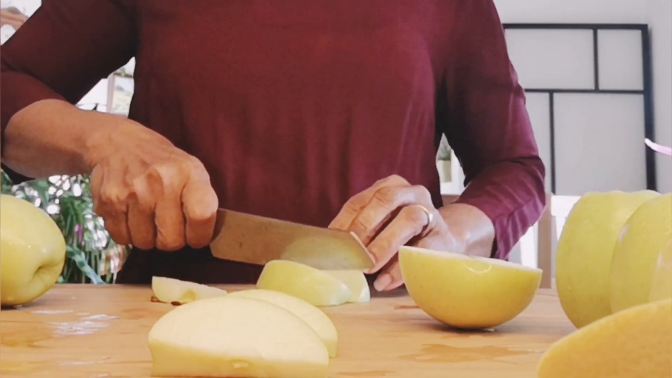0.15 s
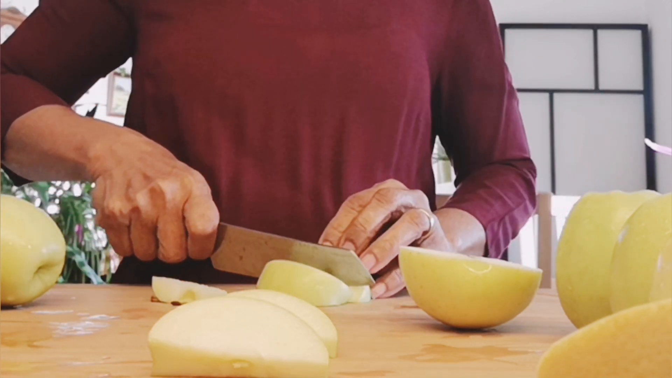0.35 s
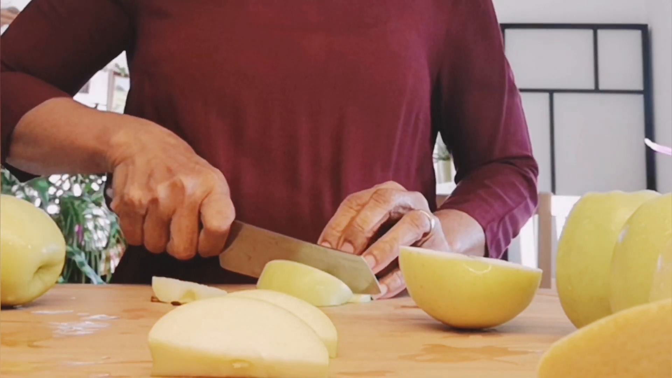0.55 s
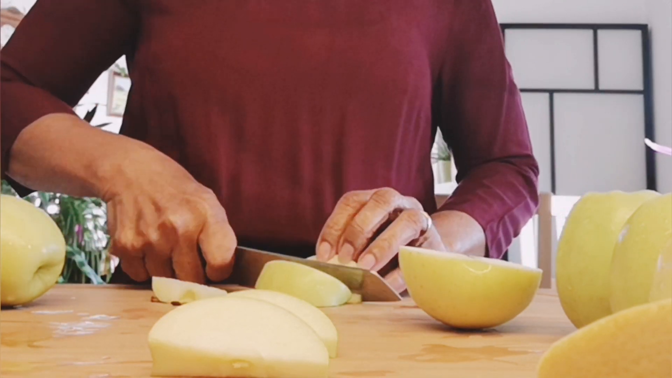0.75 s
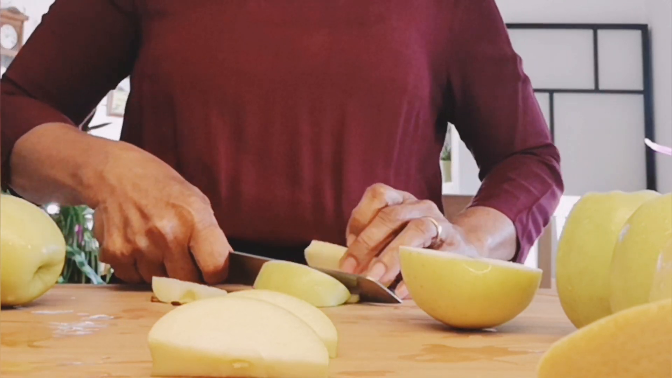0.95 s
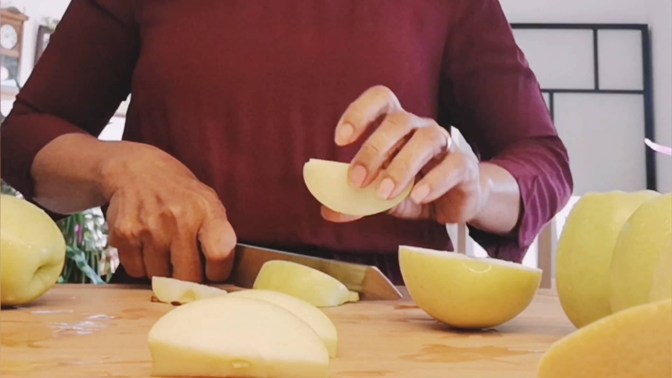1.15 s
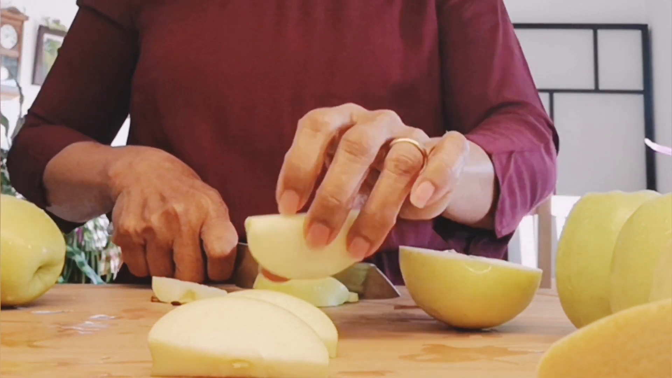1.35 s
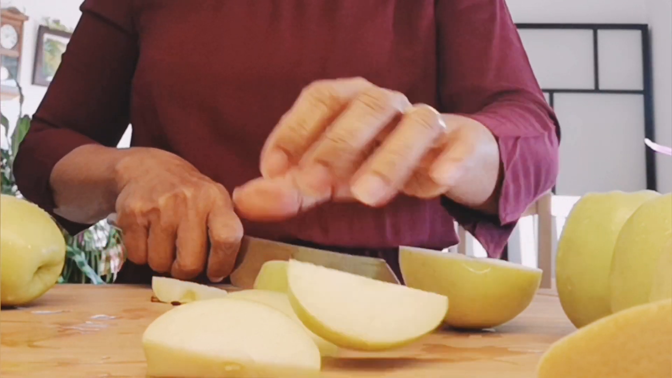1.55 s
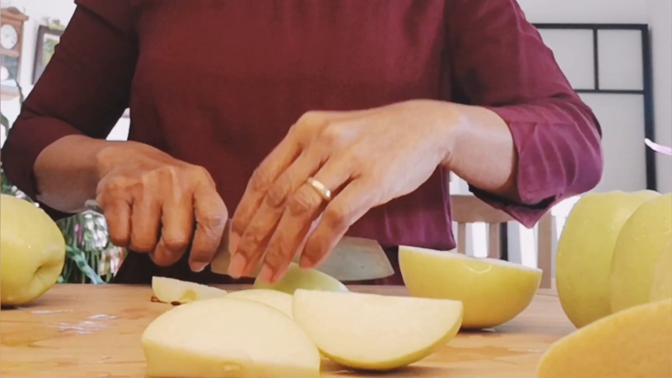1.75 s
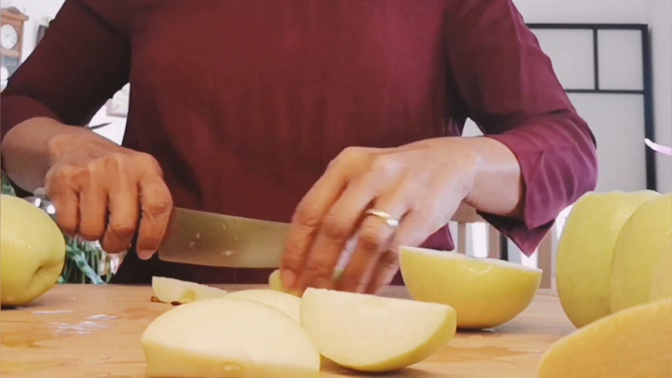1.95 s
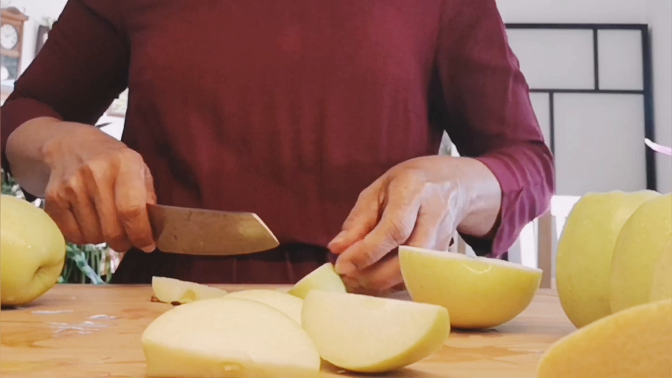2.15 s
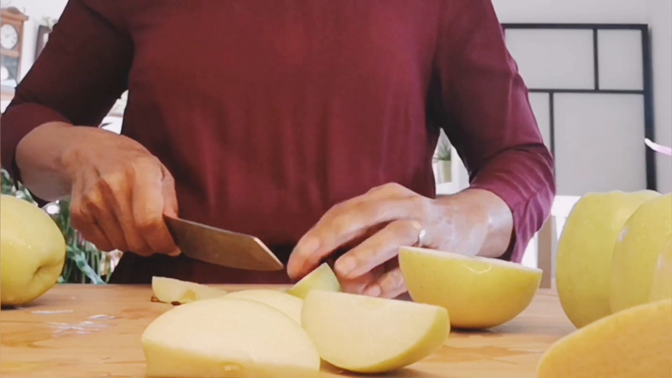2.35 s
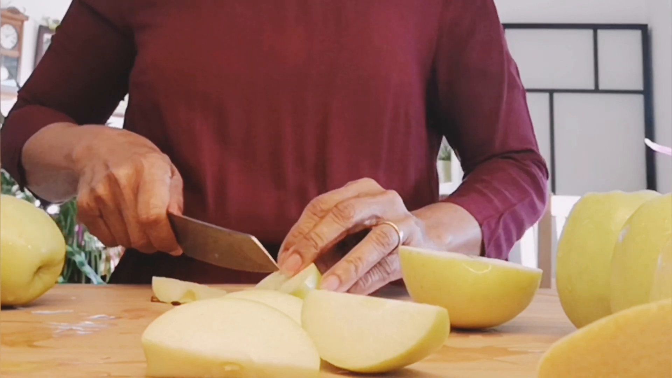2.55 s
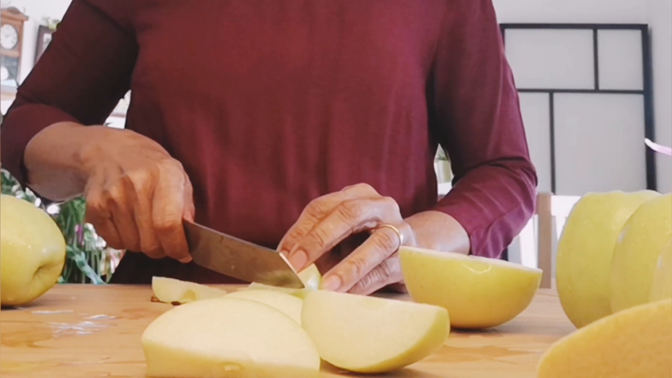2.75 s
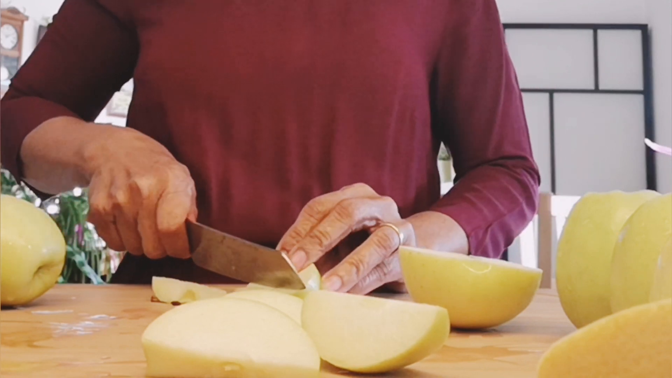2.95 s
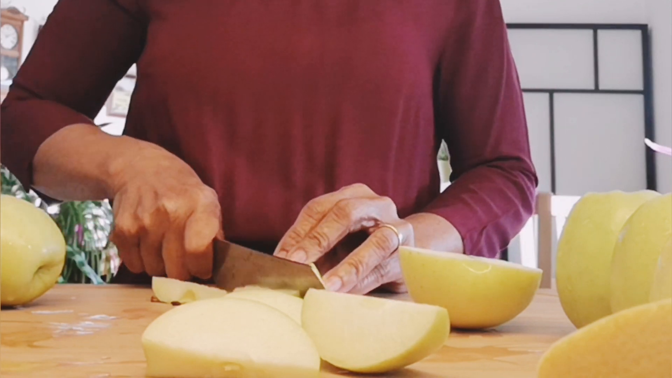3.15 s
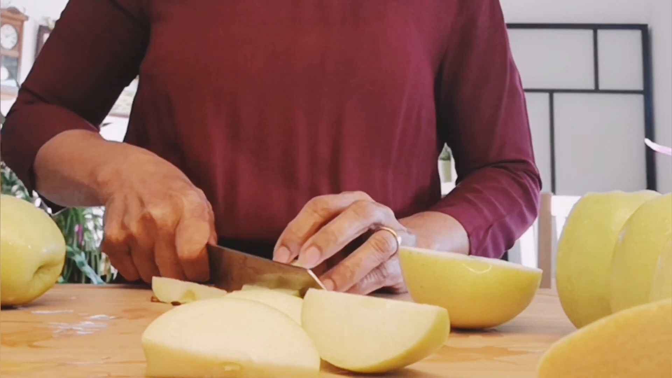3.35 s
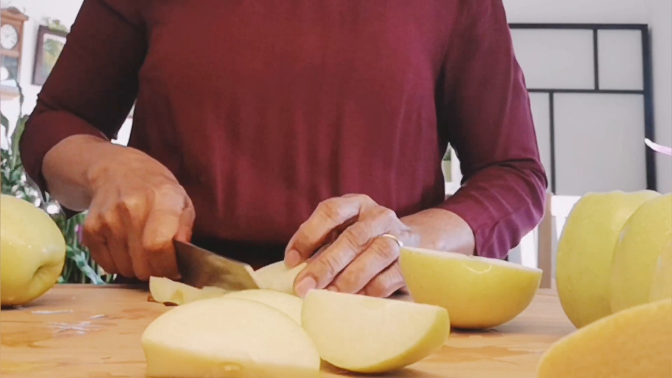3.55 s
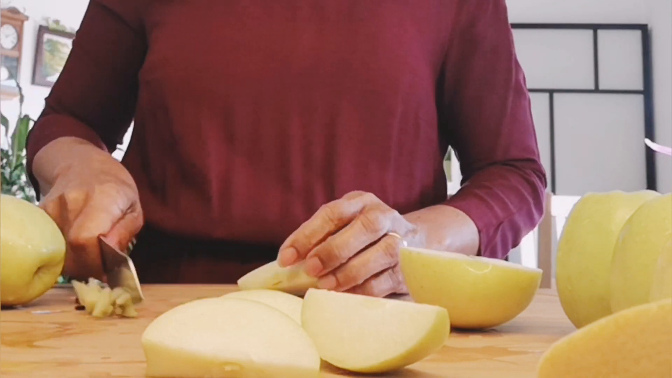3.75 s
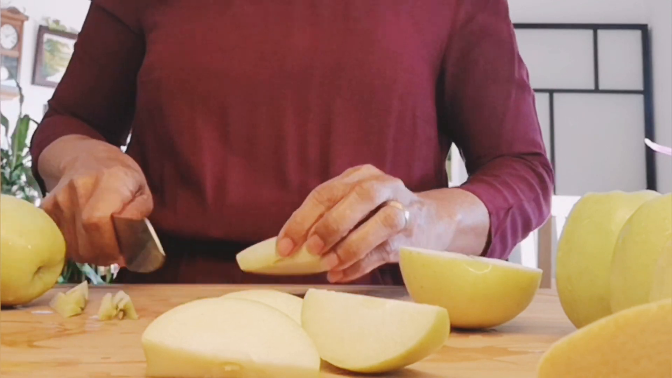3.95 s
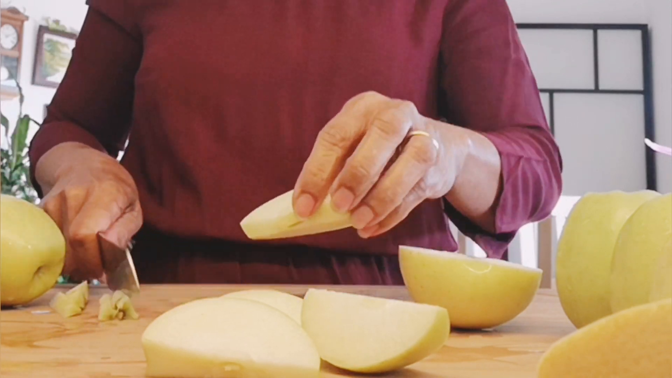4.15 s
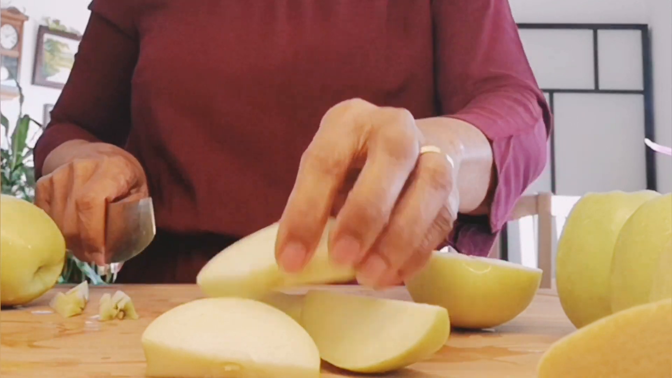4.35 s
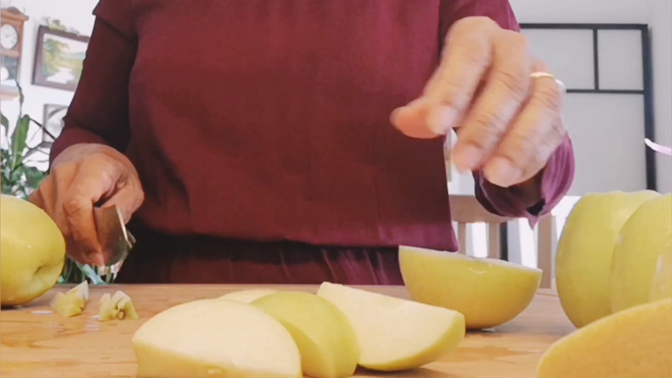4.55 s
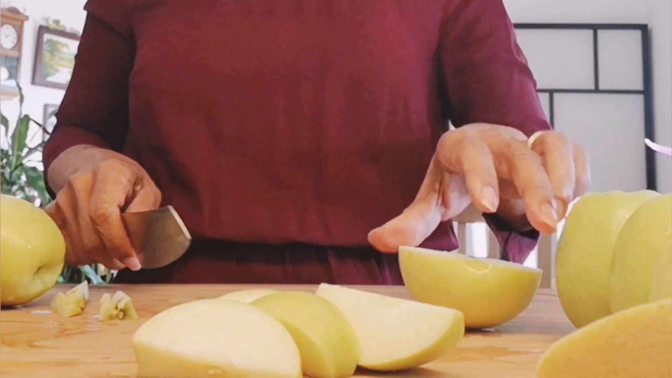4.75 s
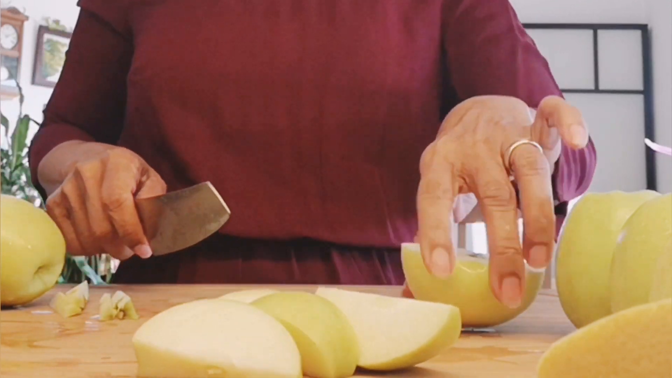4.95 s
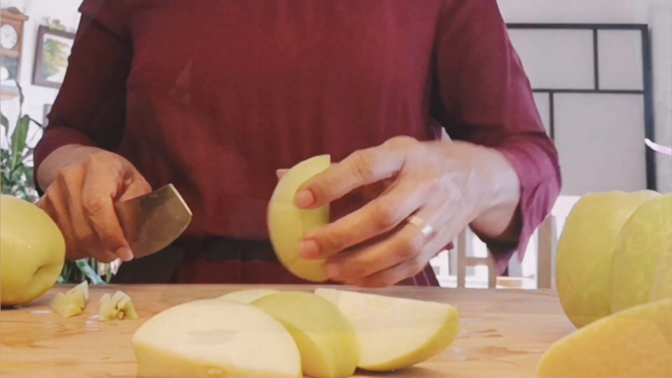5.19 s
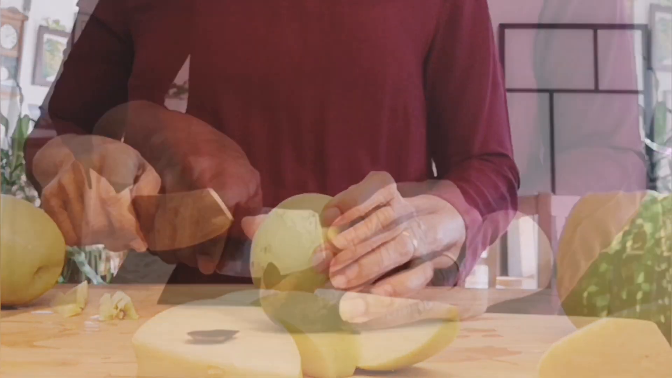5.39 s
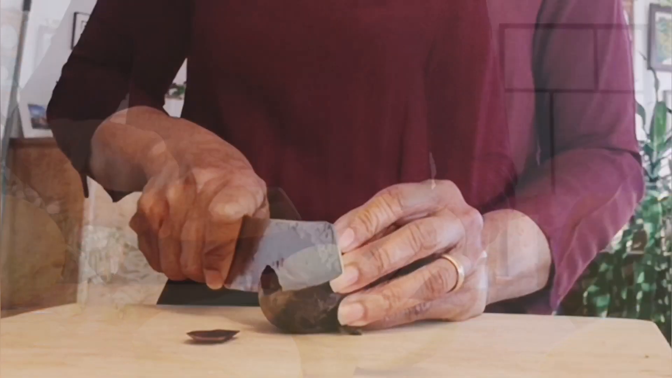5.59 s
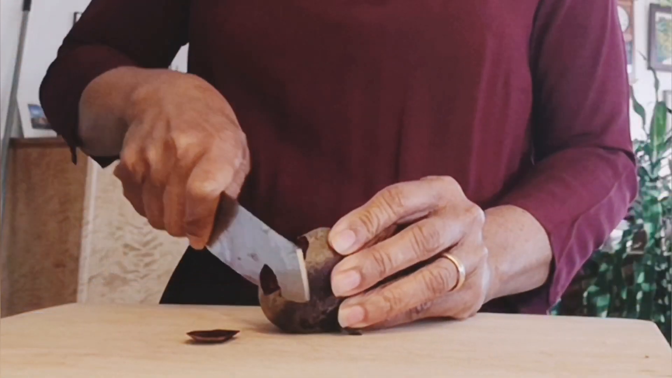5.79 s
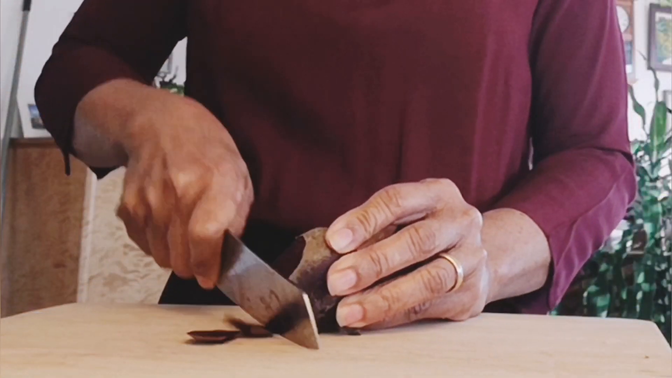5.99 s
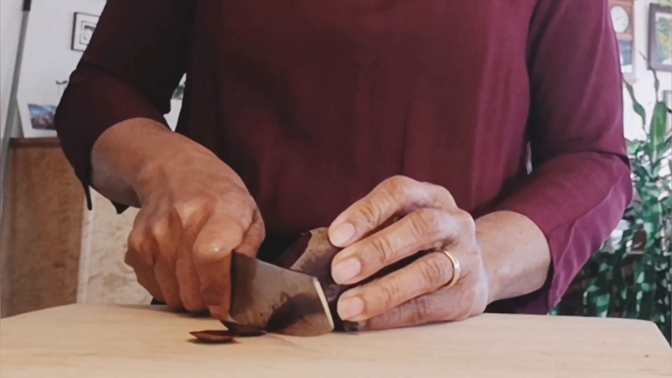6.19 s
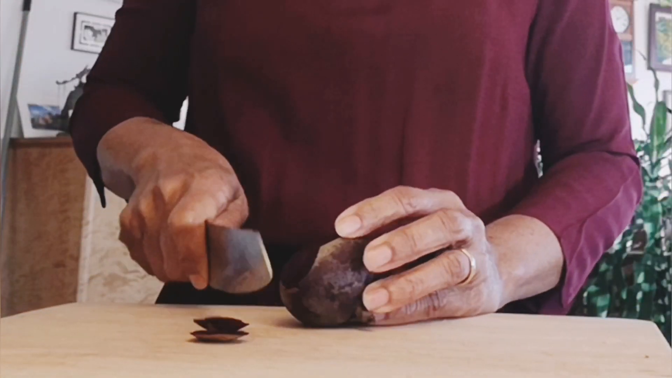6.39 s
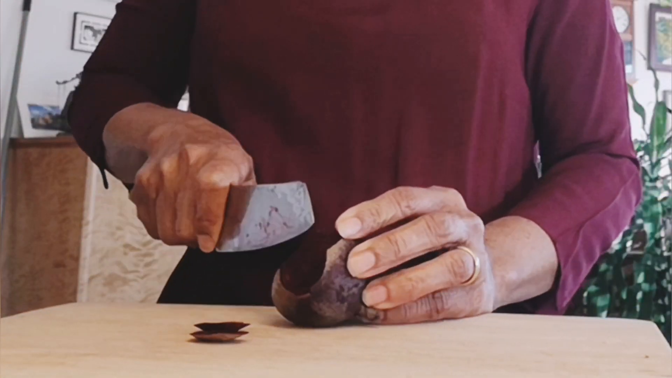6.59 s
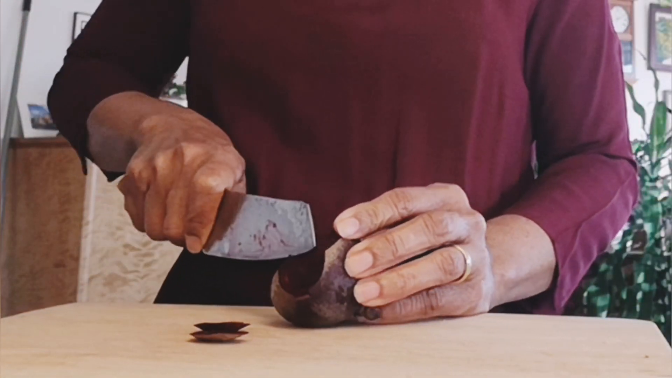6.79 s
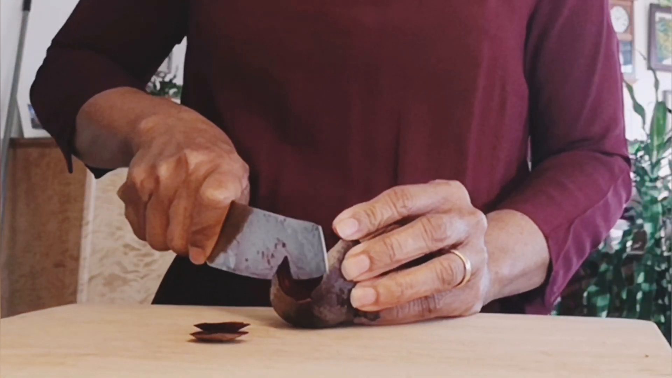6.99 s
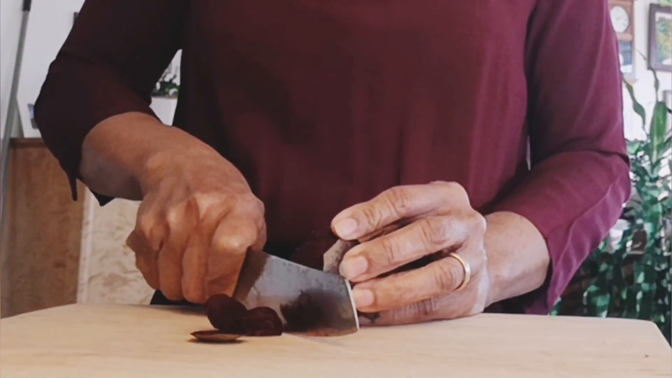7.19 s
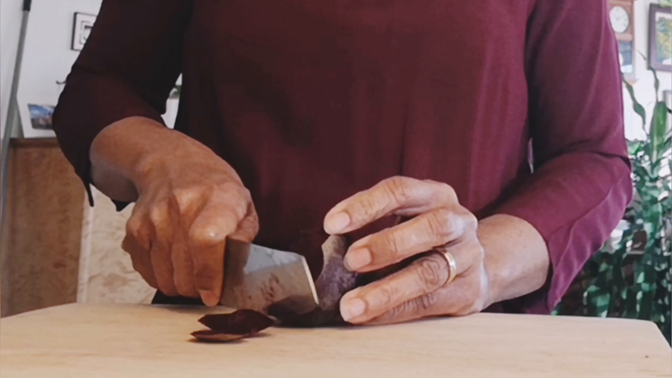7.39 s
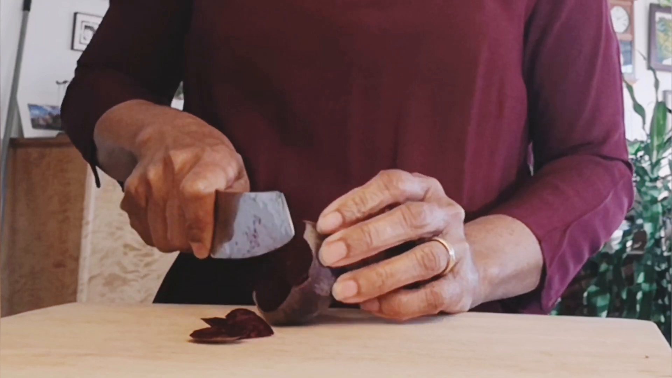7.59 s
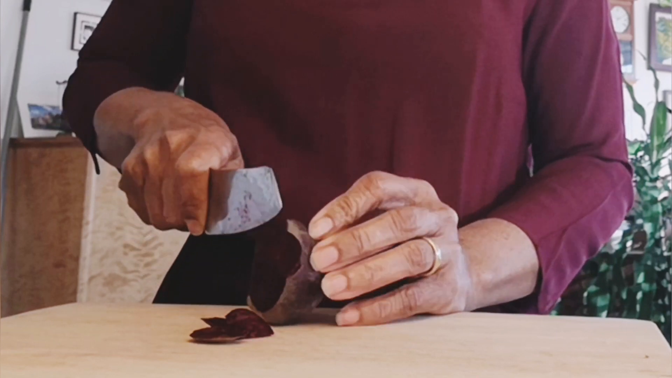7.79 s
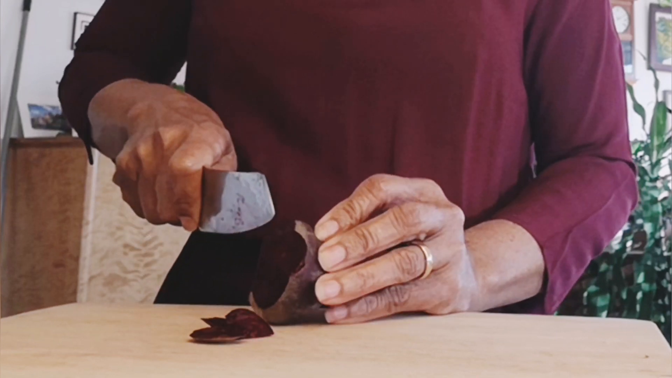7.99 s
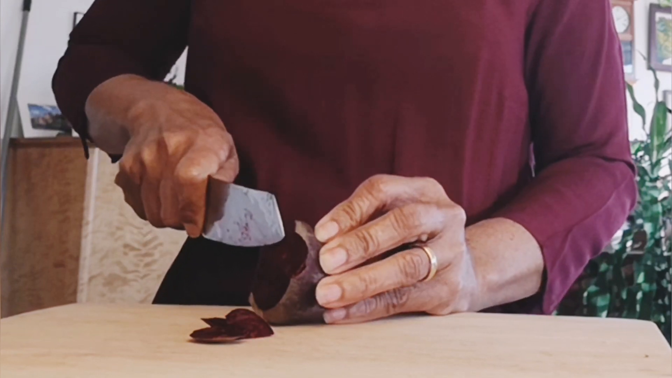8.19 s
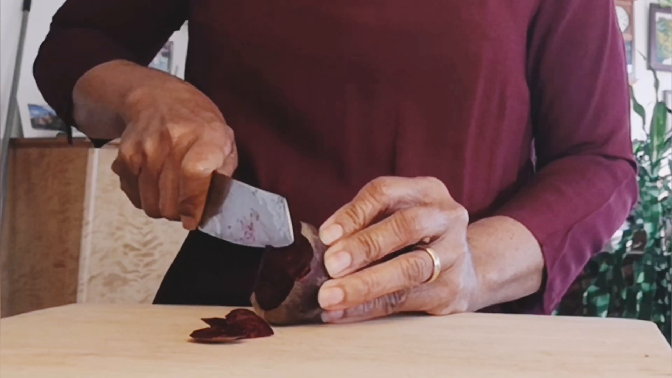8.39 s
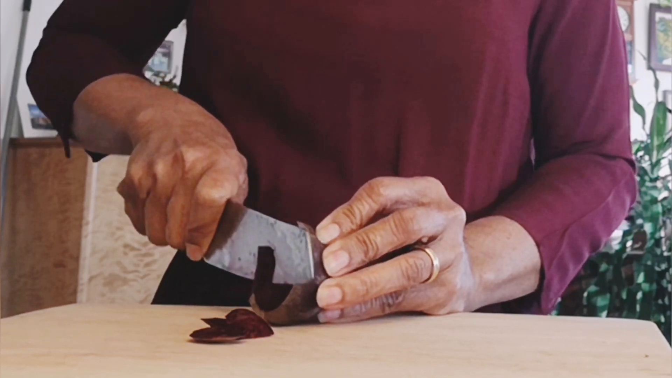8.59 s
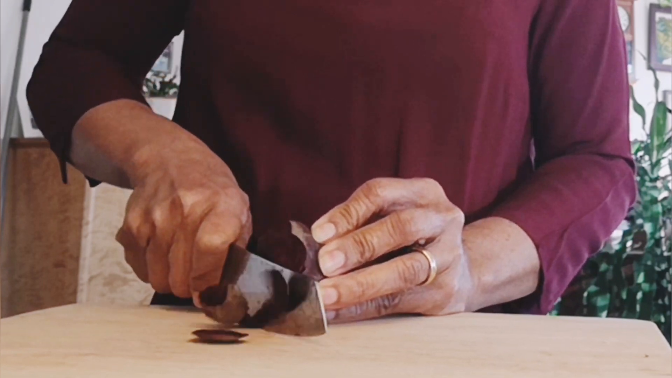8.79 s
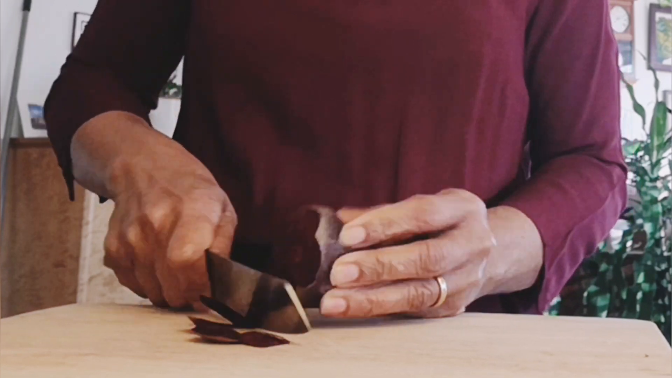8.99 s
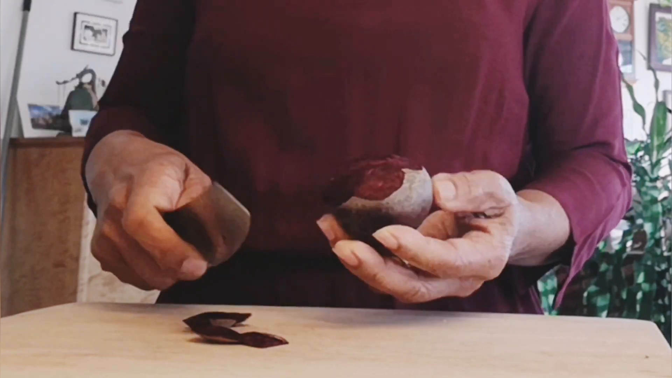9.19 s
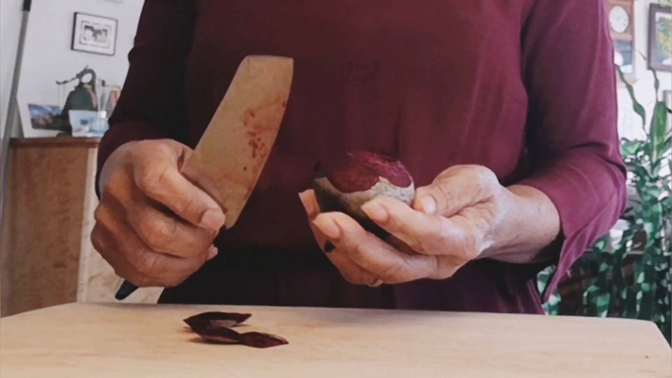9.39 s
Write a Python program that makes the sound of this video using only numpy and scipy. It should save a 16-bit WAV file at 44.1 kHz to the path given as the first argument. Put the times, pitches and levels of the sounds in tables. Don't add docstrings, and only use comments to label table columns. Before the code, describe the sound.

In a quiet kitchen, miked close in stereo, a knife slices apples on a wooden board: a light knock with a crisp crunch, small wobbling taps of pieces, then one hard ringing chop and softer ones. Later it cuts a beet, with three solid knocks and short rasping slices. Low rumble and a very faint high whine lie behind.

```python
import sys
import numpy as np
from scipy import signal
from scipy.io import wavfile
from scipy.ndimage import uniform_filter1d

SR = 44100
rng = np.random.default_rng(int(sys.argv[2]) if len(sys.argv) > 2 else 0)


def inscribe(sig):
    pcm = np.round(np.clip(np.atleast_2d(sig).T, -1, 1) * 32767)
    wavfile.write(sys.argv[1], SR, pcm.astype(np.int16))


def to_linear_factor(level_db):
    exponent = np.asarray(level_db, float) / 20
    return 10 ** exponent


N = 416304

# start_s, crest_s, end_s, hiss_db at the crest, crunch_db re hiss
STROKES = [(0.44, .5, 1.5, -70.5, 4), (0.6, 0.7, .725, -51.5, 7.5), (0.717, .77, 1.1, -67.5, 11.5),
           (1.938, 1.946, 2.04, -65.5, 13.5), (1.956, 2.09, 2.174, -66.5, 13), (2.2, 2.246, 2.3, -71.5, 8),
           (2.325, 2.397, 2.48, -85, 16.5), (2.44, 2.596, 2.73, -76.5, 11.5),
           (3.075, 3.235, 3.19, -51.5, 5.5), (3.252, 3.256, 3.273, -31.5, -6), (3.47, 3.505, 3.5, -74, 8),
           (3.54, 3.575, 3.61, -55, 8), (3.68, 3.804, 3.89, -71, -2), (4.19, 4.2, 4.29, -61, -6),
           (4.505, 4.535, 4.6, -65, 9.5), (4.53, 4.57, 4.62, -64.5, 6.5), (3.17, 3.215, 3.48, -55.5, 5),
           (5.419, 5.536, 5.64, -74.5, -1.5), (5.747, 5.95, 6.12, -76, 9.5), (6.006, 6.06, 6.4, -60.5, -3),
           (6.249, 6.35, 6.53, -61, 9), (6.957, 7.18, 7.58, -61, -1), (8.554, 8.586, 8.87, -55.5, -2.5),
           (8.598, 8.845, 8.87, -51.5, 0.5), (9.02, 9.06, 9.35, -73, 4), (9.133, 9.131, 9.27, -69.5, 9.5)]
# start_s, peak_db, low_khz, top_khz of the strongly driven band, fall_db across it
CHOPS = [
    (0.712, -11, 1.2, 1.26, 0.5),
    (3.2726, 4, 1.1, 2.75, -12),
    (4.1926, -10.5, 1.17, 2.86, -15.5),
    (4.586, -18, 0.69, 1.206, -4.5),
    (6.095, 1.5, 0.8, 3.5, -7),
    (7.2548, 2.5, .85, 2.64, -3),
    (8.857, 1, 0.99, 2.569, -8.5),
]
# start_s, peak_db, low_khz, top_khz, tick_db re knock
SNAPS = [
    (.735, -14, 1.05, 1.6, -3),
    (3.229, -20, 0.53, 4.5, -4),
    (3.258, -20.5, 1.4, 3.1, 8.5),
]
# start_s, peak_db, pitch_hz, t60_s
BLADE_RINGS = [
    (3.2585, -12.5, 7500, 0.011),
    (4.206, -34, 7880, 0.067),
    (4.21, -51, 6450, .07),
    (.7355, -24, 5200, .012),
]
# start_s, peak_db, hardness_db of treble, thump_db, tick_db
KNIFE_SIDE = [
    (0.265, -68.5, -6.5, 23.5, -28),
    (0.412, -76.5, -8.5, 2, 18.5),
    (0.764, -60.5, -9, 11, -20),
    (1.81, -47, -40, 12.5, -16),
    (4.053, -42.5, -51, -2, -26),
    (6.223, -25.5, -1, -9.5, -45),
    (6.404, -35.5, 9, -24, -10.5),
    (7.06, -35, -3.5, 2, -17),
    (8.363, -43, -28, 3.5, -42),
    (9.133, -32.5, 2.5, -11.5, -11),
]
# start_s, peak_db, hardness_db of
# treble, thump_db, tick_db
MID_BOARD = [(1.592, -46, 3, 9, -9), (1.637, -38.5, -18, 11, -10), (1.694, -39.5, 7, 10, -12),
             (1.727, -31, -9, 4.5, -12), (1.775, -36.5, -28, 7.5, -17), (1.939, -31.5, -35, -2.5, -9.5),
             (2.239, -54, 12.5, 0, -3), (4.532, -46, -4, 10, -3), (5.667, -49.5, -37, 6.5, -35),
             (5.695, -49, -37, 6, -30), (6.993, -59, -8, 4, -14.5), (7.081, -41.5, -25, 1, -17.5),
             (8.219, -54.5, 2, 7, -11), (8.49, -63.5, 0, -5, 3), (8.576, -65, 4.5, -5, 13.5),
             (8.589, -55.5, 6.5, -2, 14.5), (8.602, -58.5, 5.5, -5, 11), (8.637, -58, 4, -3.5, 11),
             (8.676, -49, 0, -7, 10), (.897, -57, 5, -9, 0), (1.795, -48.5, -15, 9, -8),
             (4.493, -63.5, 7, -6, 6), (4.515, -56.5, 0, 11, 1), (7.516, -61, 5, -10, -0.5),
             (2.558, -62, 6, -10, -5), (2.418, -63, 0, -7, -1)]
# start_s, peak_db, hardness_db of treble, thump_db, tick_db
HAND_SIDE = [
    (1.958, -39, -6, -21, -18),
    (3.551, -37.5, -10, -13.5, -11),
    (3.933, -55.5, -22, 1.5, -22),
    (5.087, -66, -17, -11, -3),
    (5.396, -49, -31, 5.5, -21),
]
# start_s, peak_db, pitch_hz, t60_s
BUMPS = [
    (0.266, -38, 140, 0.15),
    (0.414, -29, 115, 0.11),
    (0.469, -38.5, 137, 0.12),
    (5.393, -25.5, 107.2, 0.12),
    (5.666, -45, 146, 0.13),
    (5.719, -40, 140.7, 0.16),
    (6.223, -28.5, 159.7, 0.11),
    (8.688, -25, 167, 0.14),
]
# start_s, hold_s, drone_db, rumble_db of the floor, drag_db on the board
LOADS = [(.003, 0.003, -63, -45.5, -69.5), (0.425, 0.022, -47, -73, -79), (0.711, 0.029, -35.5, -43, -52.5),
         (1.641, 0.097, -48, -70, -49), (1.971, 0.045, -42, -52, -63.5), (2.491, 0.024, -56, -71.5, -73.5),
         (3.254, 0.096, -38.5, -42, -45), (4.207, 0.048, -42, -44.5, -52), (4.533, 0.022, -45, -60, -47.5),
         (4.598, 0.071, -44, -57.5, -65), (5.403, 0.048, -50.5, -69, -79), (5.676, 0.028, -65, -48, -67.5),
         (6.102, 0.064, -54.5, -44, -45), (6.224, 0.035, -37, -43.5, -53), (6.84, 0.025, -57.5, -75, -71),
         (7.019, 0.22, -47.5, -59.5, -62), (7.271, 0.072, -34, -42, -56.5), (8.601, 0.053, -41.5, -63, -59),
         (8.689, 0.019, -37, -62, -50.5), (8.858, 0.057, -30.5, -50, -58), (9.03, 0.023, -60, -53, -62)]

# pitch_hz, t60_s
BOARD = [(390, .03), (520, 0.017), (710, 0.013), (860, 0.015), (980, 0.029), (1210, .024), (1420, 0.02),
         (1690, 0.019), (1930, 0.014), (2140, 0.023), (2390, 0.022), (2770, 0.026), (3280, 0.021),
         (3650, 0.02)]
# left_lead_rad, left_right_db
APPLE_SPOT = [(-.3, -1), (-1.2, -1), (-2.1, 7), (-2.8, -2), (.2, -4), (.3, -3), (.1, 0), (.2, 4), (.6, 3),
              (.9, 3), (-.9, -2), (-2.3, 2), (-.7, -5), (.4, -4)]
# left_lead_rad, left_right_db
BEET_SPOT = [(1.3, 1), (2.4, 4), (-2.6, 10), (-2.5, 9), (-2.4, 7), (-2.4, -2), (-.6, -1), (-.5, 4),
             (.3, -2), (-.5, 12), (.3, 11), (-1.1, 2), (-.8, -9), (0, -9)]
# pitch_hz, level_db, t60_s
THUMP = [(155, -3, .12), (215, -2, .1), (265, -3, .08), (305, 0, .09), (365, -2, .07), (415, -3, .06)]
# pitch_hz, density_db per Hz
TICK = [(880, -37), (1500, -14), (1950, -5.5), (2350, -19), (2750, -10), (3310, -14), (3610, -8),
        (4310, -10.5), (5450, -11.5), (7820, -6), (9330, -35), (13800, -30), (15500, -62)]
# pitch_hz, level_db
TAP_BLOW = [(250, -31), (500, -8), (800, 2.5), (1200, -0.5), (1800, 0.5), (2800, 0.5), (3600, -9.5),
            (4500, -20.5), (8200, -31.5), (9200, -58)]
# pitch_hz, density_db per Hz
HISS = [(1760, -34.5), (3000, -6.5), (4440, -10.5), (4920, -3.5), (5840, -11), (7080, -1), (8120, -8),
        (9920, -27.5), (11200, -18), (12200, -26), (13100, -20.5), (13800, -20), (15500, -32)]
# pitch_hz, density_db per Hz
CRUNCH = [(290, -44), (500, -17), (866, -16.5), (991, -3), (1220, -4), (1420, -7), (1720, -9), (2450, -9),
          (5000, -19.5), (6500, -45.5), (11000, -120)]
# pitch_hz, width_hz, level_db
BLADE = [(3480, 120, -10), (5030, 140, -8.5), (5840, 420, -9), (7350, 600, -7)]
# pitch_hz, width_hz, level_db
APPLE_FLESH = [(1197.5, 190, 2), (1760, 230, -2), (2920, 420, -2.5), (3530, 180, 3)]
# pitch_hz, width_hz, level_db
BEET_FLESH = [(1850, 300, 3.5)]

# pitch_hz, t60_s
ROOM_T60 = [(100, .6), (300, .5), (1000, .47), (2500, .47), (3800, .46), (6000, .42), (8000, .4),
            (15000, .3)]
# pitch_hz, level_db
ROOM_COLOUR = [(100, -5.5), (400, 3), (1500, -3.5), (3000, -2.5), (5000, 1), (8000, 0), (15000, 1.5)]
# pitch_hz, width_hz, level_db
TABLE = [(145, 22, 4), (176, 11, -2), (117.45, 2.3, -3)]
# pitch_hz, density_db per Hz
HUSH = [(12, -38.5), (20, -12.5), (38, -16), (64, -6), (149, -6), (171, -6.5), (238, -29), (383, -24),
        (615, -32), (960, -24.5), (1720, -29.5), (6200, -42.5), (11400, -47), (13500, -40.5),
        (15500, -44.5)]
# pitch_hz, correlation (-1 to 1)
SAME = [(60, 1), (150, 0.99), (380, -0.049), (950, -0.88), (2380, 0.19), (5980, -0.57), (15000, -0.47)]
# time_s, pitch_hz
EARLY_PITCH = [(0, 13531), (.6, 13534), (1.1, 13510), (2.1, 13513), (2.5, 13532), (2.9, 13538),
               (3.3, 13512), (3.9, 13513), (4.3, 13527), (4.7, 13507), (5.2, 13493)]
# time_s, pitch_hz
LATE_PITCH = [(5.6, 13433), (6.1, 13420), (7.5, 13420), (7.9, 13424), (8.3, 13436), (8.8, 13436),
              (9.3, 13448)]
# level_db, burst_s, delay_s, left_right_db, left_lead_rad
WHINE_EARLY = [(-77.5, .0009, .0055, -6.5, -0.45), (-85, .002, .0075, -7.5, -2.5),
               (-82.5, 0.002, .0035, -14.5, -1.96), (-88, .0012, .008, -2, -1.3)]
# level_db, burst_s, delay_s, left_right_db, left_lead_rad
WHINE_LATE = [(-76, .0012, .0055, -14, 0.5), (-78.5, .0015, .0055, -14.5, -1.5),
              (-78.5, .0012, 0.0033, -15.5, -3), (-84.5, .0013, 0.00797, -7.5, -2.5),
              (-86, .0015, .008, 0, -3)]
EARLY_CARRIERS, LATE_CARRIERS = (100, 1000, 1100, 1300), (0, 200, 600, 1000, 1300)

CROSSFADE_S = (5.06, 6.14)
CHOP_PAN_DB = (0.16, -0.24)
KNIFE_PAN_DB, MID_PAN_DB, HAND_PAN_DB = 5.5, -0.5, 1
SNAP_PAN_DB, SNAP_FALL_DB = 2, -12
CHOP_TICK_DB, TICK_LOSS = -39.5, 1
CONTACT_S, ROLL_S = 0.0018, 0.0023
SOFTENS_HZ = (1400, 5300)
CARRIES = 0.099
EDGE_DB, ARCH, STROKE_DRAG_DB = -24, 1.3, -5.5
PATCHY_DB, PATCH_S = 2.0, .012
DRONE_SLOPES, RUMBLE_SLOPES, DRAG_SLOPES = (230, 120), (440, 240), (600, 150)  # rise, fall in dB/s
REST_DRONE_DB, REST_RUMBLE_DB = (-55.5, -57), (-75.5, -57.5)
HUSH_DB = -56
BURST_RATE_HZ = 100.0


def evened(x):
    return x / np.sqrt(np.mean(x ** 2) + 1e-20)


def peaked(x):
    return x / (abs(x).max() + 1e-12)


def read(points, hz):
    f, value = np.transpose(list(points))
    return np.interp(np.log(hz + 1), np.log(f + 1), value)


def add(mix, s, sound):
    part = mix[:, round(s * SR):][:, :sound.shape[1]]
    part += sound[:, :part.shape[1]]


def coloured(x, points):
    hz = abs(np.fft.fftfreq(4096, 1 / SR))
    log_gain = np.log(to_linear_factor(np.maximum(read(points, hz), -100)))
    taps = np.fft.ifft(np.exp(np.conj(signal.hilbert(log_gain)))).real[:2048]
    return signal.oaconvolve(x, taps[None], axes=1)[:, :x.shape[1]]


def resonate(x, hz, width):
    return signal.lfilter(*signal.iirpeak(hz, hz / width, SR), x)


def sides(pan_db):
    return to_linear_factor(np.clip(pan_db, -14, 14) * np.array([[.5], [-.5]]))


def crackle(size, per_s, spread_db, smooth):
    shared, own = rng.standard_normal(size), rng.standard_normal((2, size))
    bursting = rng.random(size) < per_s / SR
    sizes = to_linear_factor(spread_db * np.minimum(rng.exponential(1, size), 3.5)) * bursting
    puffs = signal.lfilter([1], [1, -.93], sizes)
    return (shared + 0.15 * own) * (smooth + evened(puffs))


def load(column_db, rise, fall):
    t = np.arange(0, N / SR + .01, .005)
    s, hold = np.transpose(LOADS)[:2, :, None]
    db = column_db[:, None] - rise * np.maximum(s - t, 0) - fall * np.maximum(t - s - hold, 0)
    return np.interp(np.arange(N) / SR, t, np.sqrt((to_linear_factor(db) ** 2).sum(0)))


def strokes():
    t, out = np.arange(N) / SR, np.zeros((2, N))
    apples = t < CROSSFADE_S[0]
    hiss = evened(coloured(crackle(N, 1000, spread_db=3.5, smooth=0.77), HISS))
    hiss = hiss + apples * sum(to_linear_factor(db + 8.0) * resonate(hiss, hz, width) for hz, width, db in BLADE)

    crunch = evened(coloured(crackle(N, 1000, spread_db=5.0, smooth=1.7), CRUNCH))
    apple = sum(to_linear_factor(db) * resonate(crunch, hz, width) for hz, width, db in APPLE_FLESH)
    beet = sum(to_linear_factor(db) * resonate(crunch, hz, width) for hz, width, db in BEET_FLESH)
    catch = evened(uniform_filter1d(rng.standard_normal(N), int(PATCH_S * SR)))
    crunch = evened(crunch + np.where(apples, apple, beet)) * to_linear_factor(PATCHY_DB * catch)

    rub = crackle(N, 240, spread_db=4.5, smooth=4.2)
    drag = resonate(resonate(rub, 360, 90), 320, 140) + resonate(resonate(rub, 420, 100), 410, 160)
    drag = evened(signal.sosfilt(signal.butter(4, 480, fs=SR, output="sos"), evened(drag)))

    for start, crest, end, hiss_db, crunch_db in STROKES:
        span = slice(int(start * SR), int(end * SR))
        away = np.interp(t[span], (start, crest, end), (1, 0, 1))
        swell = to_linear_factor(hiss_db + EDGE_DB * away ** ARCH)
        layers = hiss[:, span] + to_linear_factor(crunch_db) * crunch[:, span] + to_linear_factor(STROKE_DRAG_DB) * drag[:, span]
        out[:, span] += swell * layers * signal.windows.tukey(len(away), .1)
    return out + load(np.transpose(LOADS)[4], *DRAG_SLOPES) * drag


def chop(s, db, low, top, fall_db, tick_db, pan_db):
    blow = [(250 * low, -26), (450 * low, -13), (800 * low, -5), (1000 * low, 0),
            (1000 * top, fall_db), (1150 * top, fall_db - 13.5),
            (5200, -44 + 4.3 * top), (8200, -48), (9200, -60)]
    return knock(s, db, blow, -21.0 - 0.46 * db, tick_db, pan_db, CONTACT_S / top)


def tap(s, db, hard_db, thump_db, tick_db, pan_db):
    treble_db = (0, 0.99 * hard_db + 5.5)
    blow = [(hz, level_db + read(zip(SOFTENS_HZ, treble_db), hz)) for hz, level_db in TAP_BLOW]
    return knock(s, db, blow, thump_db, tick_db, pan_db, ROLL_S)


def knock(s, db, blow, thump_db, tick_db, pan_db, rise_s):
    t = np.arange(8192) / SR
    chance = rng.standard_normal((len(BOARD) + len(THUMP), 6))
    grit = rng.standard_normal((2, len(t)))
    spot = APPLE_SPOT if s < CROSSFADE_S[0] else BEET_SPOT
    modes = [(hz, read(blow, hz), t60, *ports) for (hz, t60), ports in zip(BOARD, spot)]
    wood = ring(modes, chance, t, spread=0.36, rise_s=rise_s)
    table_modes = [(*mode, 0, 0) for mode in THUMP]
    thump = to_linear_factor(thump_db - 4.5) * ring(table_modes, chance[len(BOARD):], t, spread=0.12, rise_s=0.0023)
    decay = to_linear_factor(-60 * t / 0.018) + to_linear_factor(-21 - 60 * t / 0.12)
    tick = to_linear_factor(tick_db) * peaked(coloured(grit * decay * (1 - np.exp(-t / rise_s)), TICK))
    burst = coloured((t == 0)[None] * 1., blow)
    burst = burst * np.linalg.norm(wood) / np.linalg.norm(burst)
    burst = burst + 0.35 * wood[1:] + 0.29 * tick[:1] + 0.07 * thump[:1]
    near = to_linear_factor(db + 5.5) * (sides(pan_db) * (wood + tick) + thump)
    return s, near, to_linear_factor(db + 2.5 + CARRIES * max(db, -25)) * burst


def ring(modes, chance, t, spread, rise_s):
    out = np.zeros((2, len(t)))
    for (hz, db, t60, lead, pan_db), (tune, start, *port) in zip(modes, chance):
        shift, weight_db = np.array(port[:2])[:, None], np.array(port[2:])[:, None]
        phase = 0.8 * start + lead * np.array([[.5], [-.5]]) + spread * shift
        weight = sides(pan_db) * to_linear_factor(db + 1.7 * weight_db - 60 * t / t60)
        struck_hz = hz * (1 + .015 * tune)
        out += weight * np.sin(2 * np.pi * struck_hz * t + phase)
    return peaked(out * (1 - np.exp(-(t / rise_s) ** 2)))


def bump(s, db, hz, t60):
    t = np.arange(8192) / SR
    swing = np.sin(2 * np.pi * hz * t) * to_linear_factor(-60 * t / t60)
    swing = peaked(swing * (1 - np.exp(-t / 0.0021)))
    return s, to_linear_factor(db - 3.5) * np.array([swing, swing]), to_linear_factor(db - 3.0) * swing[None]


def blade_ring(s, db, hz, t60):
    t = np.arange(8192) / SR
    steel = np.sin(2 * np.pi * hz * t)
    steel = steel + 0.6 * np.sin(2 * np.pi * (hz + 90) * t) + 0.5 * np.sin(2 * np.pi * (hz - 160) * t)
    steel = to_linear_factor(db) * peaked(steel * to_linear_factor(-60 * t / t60) * np.minimum(5.0 * t / t60, 1))
    return s, sides(8.0) * steel, to_linear_factor(-15.0) * steel[None]


def blows():
    hard = []
    for s, db, *band in CHOPS:
        hard.append((s, db, *band, CHOP_TICK_DB - TICK_LOSS * db, np.interp(s, CROSSFADE_S, CHOP_PAN_DB)))
    for *row, tick_db in SNAPS:
        hard.append((*row, SNAP_FALL_DB, tick_db, SNAP_PAN_DB))
    places = ((KNIFE_SIDE, KNIFE_PAN_DB), (MID_BOARD, MID_PAN_DB), (HAND_SIDE, HAND_PAN_DB))
    light = [(*row, pan_db) for rows, pan_db in places for row in rows]
    sounds = [chop(*row) for row in sorted(hard)] + [tap(*row) for row in sorted(light)]
    return sounds + [bump(*row) for row in BUMPS] + [blade_ring(*row) for row in BLADE_RINGS]


def room(x):
    taps = np.zeros((2, SR))
    at = np.arange(200, SR - 20, 20) + rng.integers(0, 20, (2, (SR - 201) // 20))
    np.put_along_axis(taps, at, rng.choice([-1., 1.], at.shape), 1)
    hz, t, z = signal.stft(taps, SR, nperseg=256)
    z[1, :2] = z[0, :2]
    fall_db = 60 * t * (0.57 + 1.0 * t) / read(ROOM_T60, hz)[:, None]
    z = z * to_linear_factor(read(ROOM_COLOUR, hz)[:, None] - fall_db)
    z = z * (1 + 6.5 * np.exp(-t / 0.0086))
    tail = signal.istft(z, SR, nperseg=256)[1]
    return signal.fftconvolve(x.mean(0)[None], tail / np.linalg.norm(tail[0]), axes=1)[:, :N]


def drone():
    t, columns = np.arange(N) / SR, np.transpose(LOADS)
    rest_hum = to_linear_factor(np.interp(t, CROSSFADE_S, REST_DRONE_DB))
    rest_rumble = to_linear_factor(np.interp(t, CROSSFADE_S, REST_RUMBLE_DB))
    hum_gain = np.hypot(load(columns[2], *DRONE_SLOPES), rest_hum)
    rumble_gain = np.hypot(load(columns[3], *RUMBLE_SLOPES), rest_rumble)
    push = rng.standard_normal(N) + .08 * rng.standard_normal((2, N))
    hum = sum(to_linear_factor(db) * resonate(resonate(push, hz, width), hz, 2 * width) for hz, width, db in TABLE)
    rumble = resonate(resonate(push, 72, 32), 93, 50)
    return hum_gain * evened(hum) + rumble_gain * evened(rumble)


def whine(pitch, carriers, bursts):
    t, period = np.arange(N) / SR, 1 / BURST_RATE_HZ
    turns = np.cumsum(np.interp(t, *np.transpose(pitch))) / SR
    out = np.zeros((2, N))
    for above, (db, length, delay, pan_db, lead) in zip(carriers, bursts):
        from_burst = (t - delay + period / 2) % period - period / 2
        gate = np.exp(-.5 * (from_burst / length) ** 2)
        tone = np.sin(2 * np.pi * (turns + above * t) + lead * np.array([[1], [0]]))
        out += to_linear_factor(db) * sides(pan_db) * evened(gate * tone)
    return out


def hush():
    frames, hz = N // 512 + 5, np.fft.rfftfreq(2048, 1 / SR)
    a, b, c, d, patches = rng.standard_normal((frames, 1025, 5)).T
    patches = evened(uniform_filter1d(uniform_filter1d(patches, 20, 0), 8, 1))
    same = np.clip(read(SAME, hz), -1, 1)[:, None]
    left = a + 1j * b
    right = same * left + np.sqrt(1 - same ** 2) * (c + 1j * d)
    z = np.array([left, right]) * to_linear_factor(read(HUSH, hz)[:, None] + 1.0 * patches)
    return to_linear_factor(HUSH_DB) * evened(signal.istft(z, nperseg=2048, noverlap=1536)[1][:, :N])


def scene():
    knocks, bursts = np.zeros((2, N)), np.zeros((1, N))
    for s, near, burst in blows():
        add(knocks, s, near)
        add(bursts, s, burst)
    cuts = strokes()
    late = np.interp(np.arange(N) / SR, CROSSFADE_S, (0, 1))
    lamp = (1 - late) * whine(EARLY_PITCH, EARLY_CARRIERS, WHINE_EARLY)
    lamp = lamp + late * whine(LATE_PITCH, LATE_CARRIERS, WHINE_LATE)
    echoes = room(to_linear_factor(-2.0) * bursts + to_linear_factor(2.5) * cuts)
    return knocks + cuts + echoes + drone() + hush() + lamp


def roll_off(x):
    return signal.sosfilt(signal.butter(12, 15690, fs=SR, output="sos"), x)


def record(dry):
    power_db = 10 * np.log10(abs(uniform_filter1d((dry ** 2).mean(0), 150)) + 1e-12)
    fall = np.arange(N) * 140.0 / SR
    held_db = np.maximum.accumulate(power_db + fall) - fall
    duck_db = 0.5 * np.maximum(held_db + 21.0, 0)
    duck_db = signal.lfilter([.004], [1, -.996], duck_db)
    gate_db = uniform_filter1d(np.clip(0.19 * (-37.0 - held_db), 0, 4.5), 1500)
    dry = signal.sosfilt(signal.butter(1, 25, "high", fs=SR, output="sos"), dry)
    level = dry * to_linear_factor(-0.5 - duck_db - gate_db)
    rounded = level / (3.5 + level ** 6) ** (1 / 6)
    rounded = signal.oaconvolve(rounded, signal.firwin(255, 15700, fs=SR)[None], "same")
    return roll_off(rounded)


dry = scene()
out = record(dry)
inscribe(out)
```